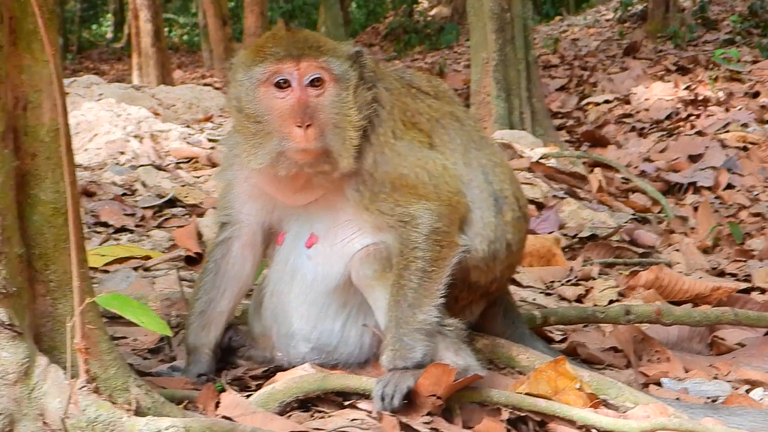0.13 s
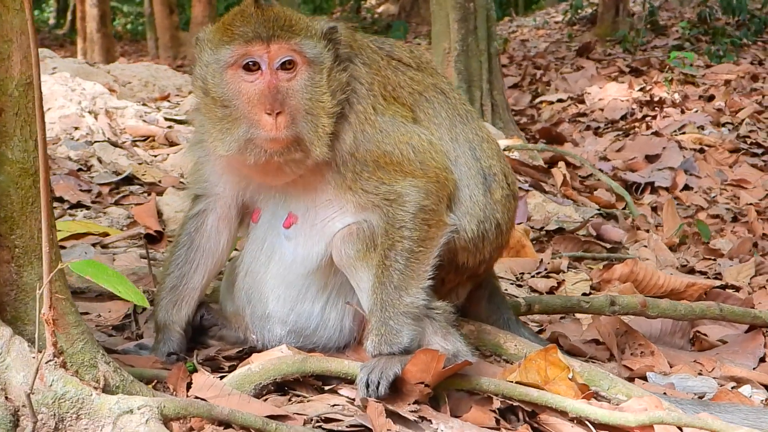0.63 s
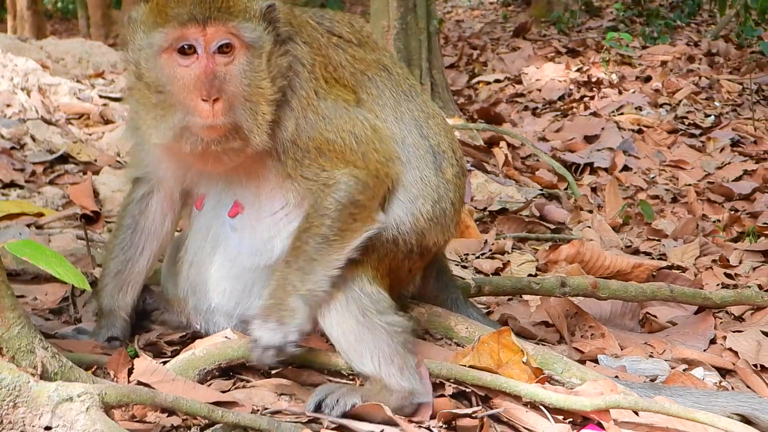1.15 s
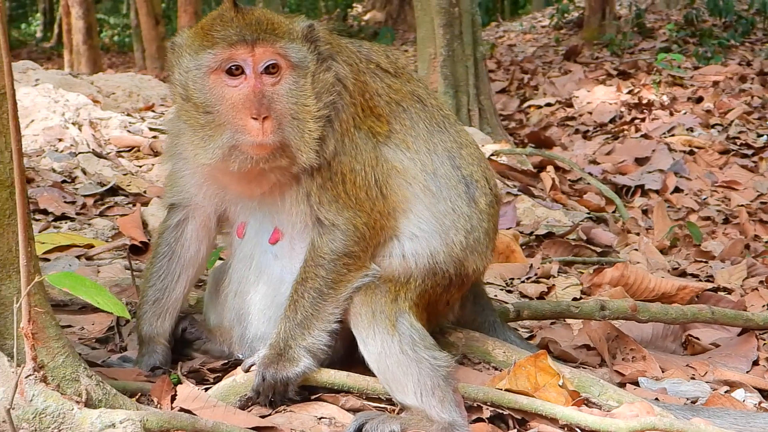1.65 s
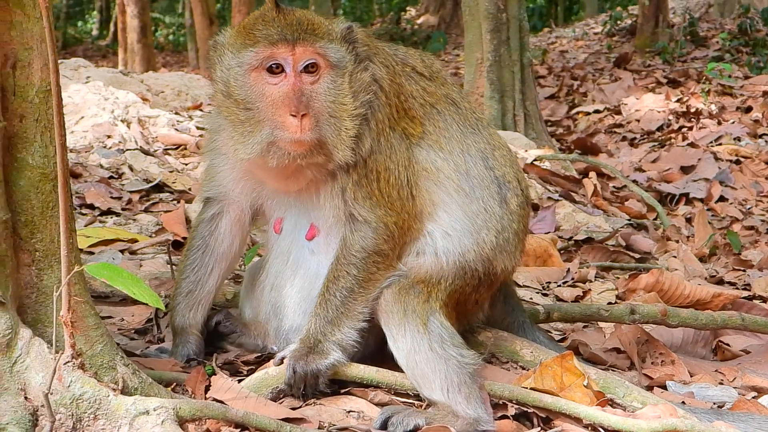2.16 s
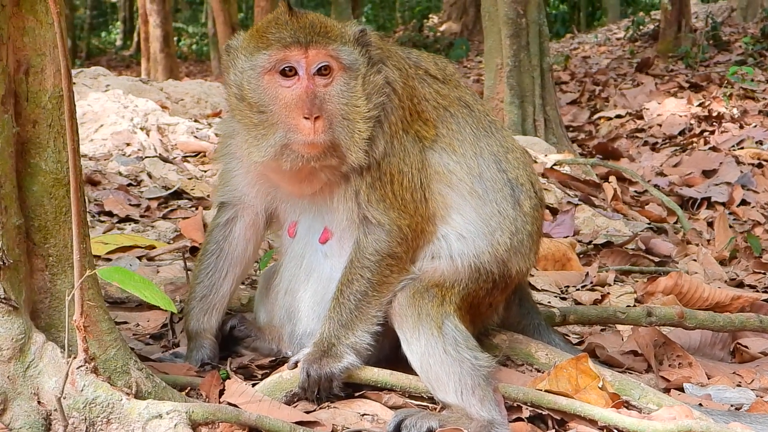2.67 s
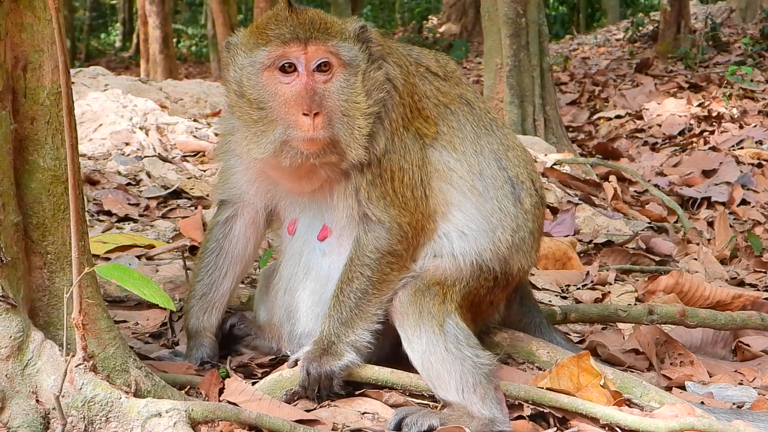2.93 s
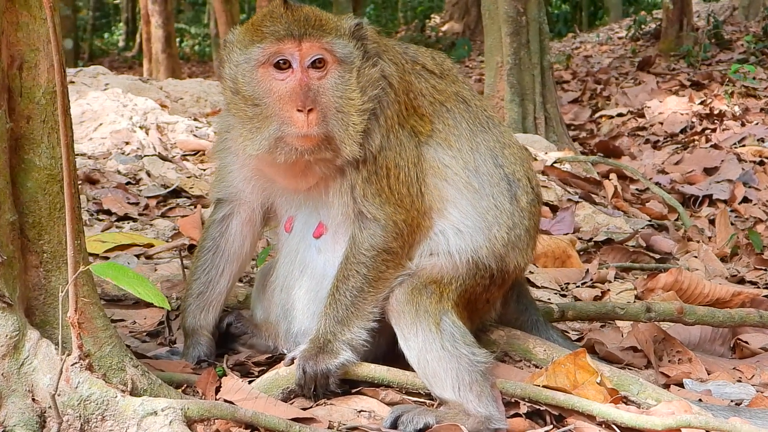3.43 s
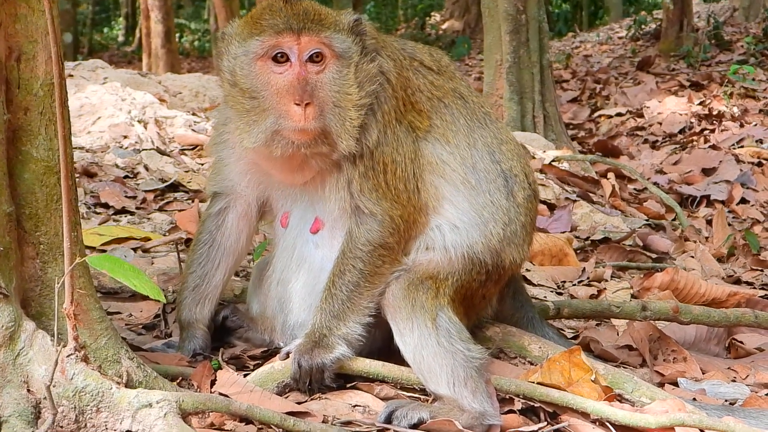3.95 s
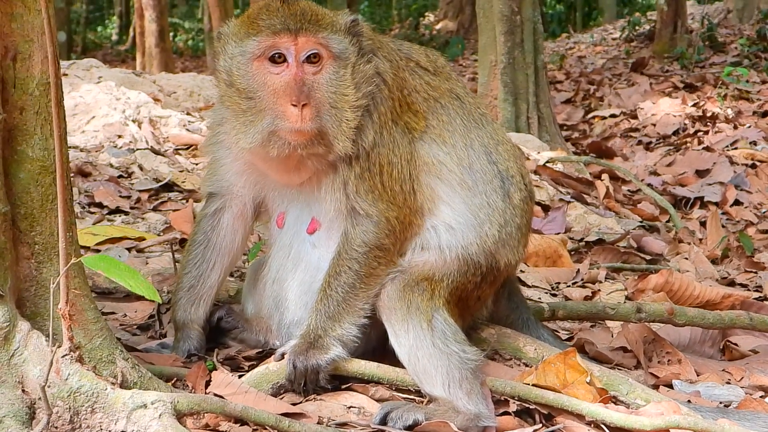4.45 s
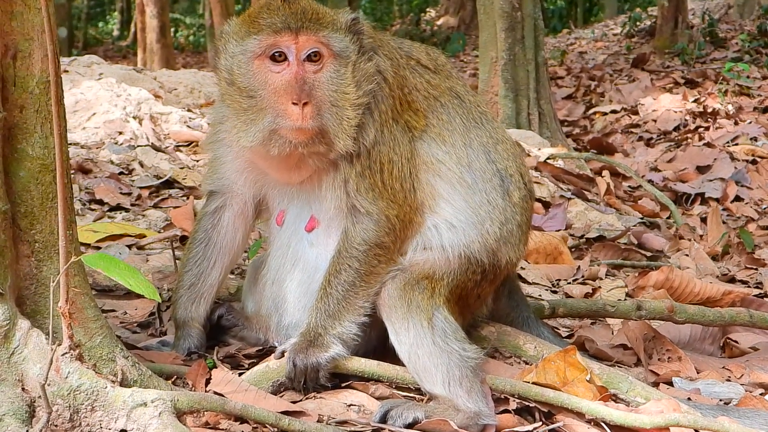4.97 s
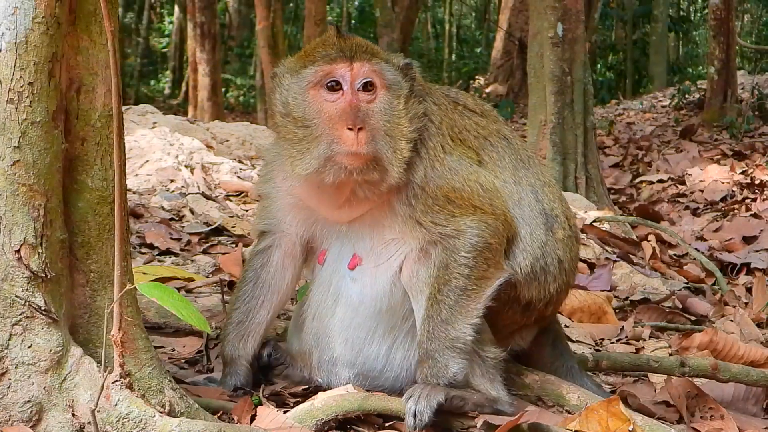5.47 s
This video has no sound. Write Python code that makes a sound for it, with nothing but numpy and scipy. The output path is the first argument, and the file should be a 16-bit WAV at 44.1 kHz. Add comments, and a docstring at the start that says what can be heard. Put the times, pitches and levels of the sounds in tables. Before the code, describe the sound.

Dense, high, fizzing cicadas drone throughout an open forest. Faint distant squeals and whistles echo among trunks. At about one second a monkey close to the stereo microphone shifts on dry leaves, making crisp snaps and crackles, then gives one brief low hoot. More far whistles and a squeal follow before a sudden half-second silence; the insects then return with faint clicks.

```python
"""A steady chorus of cicadas runs throughout, with a faint low hum: noise shaped into bands and smeared tones.
Far off, a bird whistles and another monkey squeals: gliding tones with many echoes.
Close by, a monkey shifts on dry leaves: ringing snaps and clouds of tiny cracks. It gives one short hoot,
a falling tone. Near the end all sound is muted for half a second."""
import sys
import numpy as np
from scipy import signal
from scipy.fft import rfft, irfft
from scipy.io import wavfile
from scipy.ndimage import uniform_filter1d

SR = 44100
rng = np.random.default_rng(int(sys.argv[2]) if len(sys.argv) > 2 else 0)


def boost(x):
    """Linear amplitude factor 10**(x/20) for a level x in decibels (scalar or array-like)."""
    u = np.asarray(x, float) / 20
    return 10 ** u


def persist_wave(psi):
    """Save psi, clipped to +-1, as 16-bit WAV."""
    counts = np.round(np.clip(psi, -1, 1) * 32767).astype(np.int16)
    wavfile.write(sys.argv[1], SR, np.atleast_2d(counts).T)


N = 246959  # length in samples

# the muted gap: fade_out_start_s, fade_out_end_s, fade_in_start_s, fade_in_end_s
MUTED_GAP = (4.778, 4.801, 5.307, 5.32)


def evened(x):
    """Scales a sound to an rms (average strength) of one."""
    return x / np.sqrt(np.mean(x ** 2) + 1e-20)


def read(points, hz):
    """Reads a curve between its points; frequency is spaced as the ear hears it, by ratio."""
    point_hz, value = np.transpose(points)
    return np.interp(np.log(hz + 1), np.log(point_hz + 1), value)


def ears(lean_db):
    """Left and right gains that differ by lean_db; a positive lean is to the left."""
    return boost(np.array([[.5], [-.5]]) * lean_db)


def place(mix, start_s, sound, lean_db):
    """Adds a sound to a copy of the mix at its start time, leaning left or right."""
    sound = np.pad(sound, (round(start_s * SR), N))[:N]
    return mix + ears(lean_db) * sound


def band(x, low_hz, high_hz, order):
    """Lets through mainly the sound between two frequencies."""
    return signal.sosfilt(signal.butter(order, [low_hz, high_hz], "band", fs=SR, output="sos"), x)


def blurred(hz, blur_hz):
    """A tone smeared by chance over a narrow band, unrelated at the two ears."""
    return evened(band(rng.standard_normal((2, N)), hz - blur_hz / 2, hz + blur_hz / 2, order=2))


def wander(count, hz):
    """A slow random drift of rms one, moving mostly slower than about hz."""
    return evened(signal.lfilter([1], [1, -np.exp(-2 * np.pi * hz / SR)], rng.standard_normal(count)))


def chorus():
    """Countless far insects and the forest air blur into noise with drifting patches."""
    # shape of the sound before its overall level is set: pitch_hz, level_db (per Hz)
    chorus_spectrum = [(30, -27.5), (90, -32.5), (170, -13), (300, -13), (700, -15.5), (1500, -15),
                       (2600, -19), (3800, -15.5), (4200, -7.5), (4550, 0), (5100, 4), (6900, 1),
                       (9000, -11), (9900, -21.5), (10600, -30.5), (12500, -35), (15500, -56)]
    # slow swells on that shape: time_s, air_level_db (below the chorus), fizz_level_db (high treble)
    slow_swells = [(0, 2, -9), (.6, -.5, -5), (1.2, 2.5, -2.5), (2, -0.5, -7), (3, 0.5, -6), (3.6, 1.5, -3),
                   (4.4, 1.5, 0), (4.8, 1, -3), (5.6, 5.5, -4.5)]
    # how alike the ears are: pitch_hz, likeness (1 = same, 0 = unrelated)
    ear_likeness = [(60, 0.72), (180, 0.91), (550, 0.75), (1650, 0.67), (4970, 0.17), (15000, 0.03)]
    # balance between the ears: pitch_hz, left_minus_right_db
    ear_lean = [(60, 4.5), (110, 2), (200, -1.5), (380, 3.5), (700, 2), (1290, 0), (2380, 2), (4400, -2.5),
                (8120, -2.5), (15000, 13.5)]
    chorus_rms_db = -29.5

    size, hop = 1024, 256  # samples in a short slice of noise, samples between slices
    frames, hz = N // hop + 5, np.fft.rfftfreq(size, 1 / SR)
    a, b, c, d, patches = rng.standard_normal((frames, len(hz), 5)).T
    # smooth over pitch, then over time
    patches = evened(uniform_filter1d(uniform_filter1d(patches, 10, 0), 20, 1))

    swell_s, air_db, fizz_db = np.transpose(slow_swells)
    frame_s = np.arange(frames) * hop / SR
    air = np.interp(frame_s, swell_s, air_db)
    fizz = np.interp(frame_s, swell_s, fizz_db)
    swell = np.where(hz[:, None] < 4000, air, np.where(hz[:, None] < 10500, 0, fizz))

    same = np.clip(read(ear_likeness, hz), -1, 1)[:, None]
    left = a + 1j * b
    right = same * left + np.sqrt(1 - same ** 2) * (c + 1j * d)
    shape = boost(read(chorus_spectrum, hz)) * ears(read(ear_lean, hz))
    slices = np.array([left, right]) * shape[:, :, None] * boost(patches + swell)
    noise = signal.istft(slices, nperseg=size, noverlap=size - hop)[1][:, :N]
    return boost(chorus_rms_db) * evened(noise)


def cicadas():
    """Overtones of each drum's pulse rate, smeared by many slightly unequal singers, other ones at each ear."""
    # kinds of near cicada: pulses_per_s, level_db (before effort), left_minus_right_db,
    # hiss of uneven pulses (low_hz, high_hz, relative_db),
    # overtones the drum lets out (multiple of the rate, relative_db, blur_hz)
    cicada_kinds = [(135.75, -42, -3, (7140, 7505, 2.5), [(52, -8, 14), (52.4, -8, 110), (53, -6, 40),
                    (54, 1, 80), (55, -.5, 60), (56.4, -13, 160)]), (193, -72, 4, (9980, 10520, 1.5),
                    [(52, -3, 70), (53, -1, 80), (54, -5, 80)]), (226, -80, 0, (11400, 12000, 0),
                    [(52, -2, 120)])]
    # how hard they drum: time_s, added_level_db
    drumming_effort = [(0, 6), (2.1, 4.5), (2.6, 6), (4.8, 6.5), (5.6, 4.5)]

    out = np.zeros((2, N))
    for rate_hz, db, lean_db, (low_hz, high_hz, hiss_db), overtones in cicada_kinds:
        kind = boost(hiss_db) * evened(band(rng.standard_normal((2, N)), low_hz, high_hz, order=8))
        for multiple, overtone_db, blur_hz in overtones:
            kind += boost(overtone_db) * blurred(multiple * rate_hz, blur_hz)
        out += boost(db) * ears(lean_db) * kind
    effort_s, effort_db = np.transpose(drumming_effort)
    return out * boost(np.interp(np.arange(N) / SR, effort_s, effort_db))


def hum():
    """Low far-off sounds, alike at both ears: wavering tones and a band of noise that swells once and fades."""
    # wavering tones: pitch_hz, level_db, blur_hz
    hum_tones = [(158.7, -69.5, 4.7), (190.2, -60.5, 13)]
    drone_s, drone_db, spread_s = 3.16, -53, 0.29  # loudest moment, level there, how long it lasts

    steady = sum(boost(db) * blurred(hz, blur_hz)[0] for hz, db, blur_hz in hum_tones)
    drone = evened(band(rng.standard_normal(N), 330, 534, order=2))
    passing = np.exp(-((np.arange(N) / SR - drone_s) / spread_s) ** 2)
    return steady + boost(drone_db) * passing * drone


def contour(start, length, db, first_hz, last_hz, edge_s, fade_db):
    """Rows (s, Hz, dB) of a call: quick rise, slide to the last pitch, slow fade, quick fall."""
    slide_share, edge_db = .45, -8  # share of the call spent sliding, extra level at its two ends
    edge = min(edge_s, length / 3)
    slide_end = np.clip(slide_share * length, edge, length - edge)
    s = np.sort([0, edge, slide_end, length - edge, length])
    hz = first_hz + (last_hz - first_hz) * np.minimum(s / s[2], 1)
    level_db = db + fade_db * s / length + edge_db * np.array([1, 0, 0, 0, 1])
    return np.transpose([start + s, hz, level_db])


def voice(rows, overtones, waver, flutter_db):
    """Start time and sound of a tone with overtones; its pitch (waver, a share) and level waver a little."""
    s, hz, db = np.transpose(rows)
    t = np.arange(s[0], s[-1], 1 / SR)
    pitch_hz = np.interp(t, s, hz) * (1 + waver * wander(len(t), 60))
    turns = np.cumsum(pitch_hz) / SR  # vibrations completed so far
    tone = sum(boost(g_db) * np.sin(2 * np.pi * round(k) * turns) for k, g_db in overtones)
    level = np.sqrt(2) * boost(np.interp(t, s, db) + flutter_db * wander(len(t), 25))
    return s[0], level * tone * signal.windows.tukey(len(t), .04)


def whistles():
    """Far whistled notes, of a bird or single overtones of a squeal: single tones that may slide a little."""
    # notes: start_s, length_s, level_db (before fade and flutter), first_hz, last_hz
    whistled_notes = [(0, 0.15, -59, 1670, 1700), (0.421, .21, -59, 1660, 1670),
                      (0.659, 0.12, -58.5, 1560, 1560), (2.36, 0.11, -55.5, 1472, 1447),
                      (2.468, .06, -55, 1456, 1450), (2.562, 0.097, -58.5, 1396, 1410),
                      (2.827, .04, -51.5, 1720, 1740), (2.9, .06, -60.5, 1760, 1830),
                      (3.066, 0.044, -55, 1590, 1590), (3.117, 0.077, -49, 1860, 1920),
                      (3.197, .05, -49.5, 1925, 1933), (3.284, 0.0496, -54.5, 1920, 1920),
                      (3.84, 0.068, -52.5, 1787, 1810), (3.91, 0.1, -51, 1796, 1820),
                      (4.03, 0.1, -62, 1820, 1827), (4.731, 0.081, -50, 3340, 3355)]
    out = np.zeros((2, N))
    for note in whistled_notes:
        rows = contour(*note, edge_s=.012, fade_db=-2)
        out = place(out, *voice(rows, [(1, 0.0018)], waver=0.01, flutter_db=5.0), lean_db=-3.5)
    return out


def squeals():
    """Far monkey squeals: tones rich in overtones slide to their pitch and hold it."""
    # squeals: start_s, length_s, level_db (before fade and flutter), first_hz, held_hz
    monkey_squeals = [(0, .14, -50, 788, 802), (.13, 0.24, -56.5, 842, 881), (3.571, .5, -51.5, 745, 853),
                      (3.894, .14, -52.5, 805, 795)]
    # overtones: number (multiple of the pitch), relative_db
    squeal_overtones = [(2, -14), (3, -1), (4, -2), (5, -14)]
    out = np.zeros((2, N))
    for squeal in monkey_squeals:
        rows = contour(*squeal, edge_s=.05, fade_db=-6)
        out = place(out, *voice(rows, squeal_overtones, waver=.018, flutter_db=4), lean_db=0)
    return out


def snaps():
    """A push that builds within a millisecond rings a few modes of twig or husk, with a noisy crack on top."""
    # knocks and snaps in the leaf litter: start_s, level_db, ring_hz,
    # t60_s (time to die by 60 dB, before each mode's share), crack_db (relative)
    litter_snaps = [(.173, -23.5, 763, 0.013, -4.5), (0.956, -25.5, 2653, 0.011, 1.5),
                    (.968, -12.5, 514, 0.0066, -3), (1.042, -35, 1354, 0.011, 4.5),
                    (1.103, -29, 814, 0.039, -4.5), (1.114, -24, 400, 0.01, -5.5),
                    (1.129, -16, 1250, 0.0048, -4), (1.145, -25.5, 1893, .013, -6.5),
                    (1.147, -14, 360, .0097, -11.5), (1.204, -28, 1270, 0.0063, 0),
                    (1.261, -37.5, 975, 0.012, 5.5), (1.305, -36.5, 500, 0.015, 2.5),
                    (1.334, -31, 2780, 0.005, 11.5), (1.401, -21.5, 1713, 0.0019, 7),
                    (1.413, -21.5, 1560, 0.0056, -1.5), (1.465, -3, 1585, 0.0096, -20),
                    (1.65, -27.5, 2510, 0.0065, -4), (1.745, -20.5, 330, 0.01, -17.5),
                    (5.314, -35, 645, 0.054, -1.5), (5.392, -36, 1390, 0.021, -9.5),
                    (5.517, -31, 630, 0.0098, 0.5)]
    # ways the piece rings: multiple of ring_hz, relative_db, share of t60_s
    ring_modes = [(1, 1, 1.33), (.33, -12.5, 0.98), (1.7, -2, 0.54), (2.2, -8.5, 0.63), (3.7, -4, 0.35)]
    build_s = 0.00074

    t, out = np.arange(2600) / SR, np.zeros((2, N))
    white = rng.standard_normal((len(litter_snaps), len(t)))
    for (s, db, hz, t60, crack_db), noise in zip(litter_snaps, white):
        ring = 0
        for multiple, mode_db, share in ring_modes:
            ring = ring + boost(mode_db - 60 * t / (t60 * share)) * np.sin(2 * np.pi * hz * multiple * t)
        crack = evened(band(noise, 0.95 * hz, 1.7 * hz, order=1))
        crack = crack + boost(-15.5 - 60 * t / 0.005) * noise  # a brief burst over all pitches
        push = 1 - np.exp(-(t / build_s) ** 2)
        snap = (ring + boost(crack_db - 60 * t / (2.0 * t60)) * crack) * push
        # to the left before the muted gap, to the right after
        out = place(out, s, boost(db) * snap, lean_db=6 if s < MUTED_GAP[0] else -5)
    return signal.sosfilt(signal.butter(4, 200, "high", fs=SR, output="sos"), out)


def leaves():
    """Each shift of the monkey crushes dry leaves: dense tiny cracks of unequal size, coloured by the leaves."""
    # shifts: loudest_s, held_s, level_db
    monkey_shifts = [(0.963, .005, -34), (1.109, .055, -32), (1.2, .09, -40.5), (1.335, .01, -36.5),
                     (1.41, .01, -43), (1.473, .005, -33.5), (2.72, .02, -68)]
    # colour of the cracks before scaling: pitch_hz, level_db (per Hz)
    leaf_colour = [(60, -45.5), (150, -19), (350, -3.5), (1500, 0.5), (3000, -2.5), (5000, 3), (9000, -17),
                   (13000, -24.5), (16000, -29.5)]
    cracks_per_s = 2200  # on average, drawn for each ear
    swell_db_per_s, settle_db_per_s = 500, 352

    happens = rng.random((2, N)) < cracks_per_s / SR
    size = boost(4.2 * np.minimum(rng.exponential(1, (2, N)), 5)) * happens
    cracks = size * rng.choice([-1., 1.], (2, N))
    cracks = cracks + .8 * cracks[::-1]  # each ear also hears the other's cracks
    colour = boost(read(leaf_colour, np.fft.rfftfreq(N, 1 / SR)))
    coloured = evened(irfft(rfft(cracks) * colour, N))

    t, level = np.arange(N) / SR, 0
    for s, held, db in monkey_shifts:
        before_db = swell_db_per_s * np.maximum(s - t, 0)
        after_db = settle_db_per_s * np.maximum(t - s - held, 0)
        level = level + boost(db - before_db - after_db)
    return level * coloured * ears(2.0)


def hoot():
    """The near monkey's short hoot: a tone that drops quickly in pitch, then holds almost steady."""
    # path of the hoot: time_s, pitch_hz, level_db (before overtones and flutter)
    hoot_path = [(1.5305, 694, -35), (1.533, 647, -31), (1.537, 585, -42.5), (1.542, 477, -30),
                 (1.552, 444, -30), (1.6, 441, -29.5), (1.611, 437, -34), (1.622, 436, -69)]
    # overtones: number (multiple of the pitch), relative_db
    hoot_overtones = [(1, 1.5), (2, -23)]
    return place(np.zeros((2, N)), *voice(hoot_path, hoot_overtones, waver=.002, flutter_db=.15), lean_db=7)


def trees(x, t60, wet_db):
    """Adds scattered echoes from the trunks, different at each ear, dying by 60 dB in t60 seconds."""
    t = np.arange(SR // 2) / SR
    signs = rng.choice([-1., 1.], (2, len(t)))
    happens = rng.random((2, len(t))) < 2000 / SR  # about 2000 echoes a second
    taps = signs * happens * boost(-60 * t / t60) * (t > .004)
    echoes = signal.fftconvolve(x, taps / np.linalg.norm(taps[0]), axes=1)[:, :N]
    return x + boost(wet_db) * echoes


def scene():
    """Adds all layers; near sounds get weak, short echoes, far calls strong, long ones."""
    far = trees(whistles() + squeals(), t60=.35, wet_db=0.5)
    near = trees(snaps() + leaves() + hoot(), t60=0.072, wet_db=-14.0)
    return chorus() + cicadas() + hum() + far + near


def low_pass(x):
    """Removes everything above the highest recorded frequency."""
    return signal.sosfilt(signal.butter(12, 15700, fs=SR, output="sos"), x)


def record(dry):
    """The right microphone hears one sample later; a low cut thins the bass and the gap is muted with short fades."""
    spaced = np.array([dry[0], np.roll(dry[1], 1)])
    cut = signal.sosfilt(signal.butter(2, 140, "high", fs=SR, output="sos"), spaced)
    fade = np.interp(np.arange(N) / SR, MUTED_GAP, [1, 0, 0, 1])
    finished = cut * np.sin(np.pi / 2 * fade) ** 2  # rounds the corners of the fades
    return low_pass(finished)


dry = scene()
out = record(dry)
persist_wave(out)
```